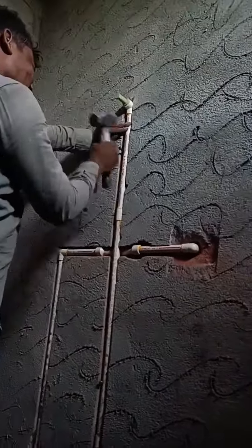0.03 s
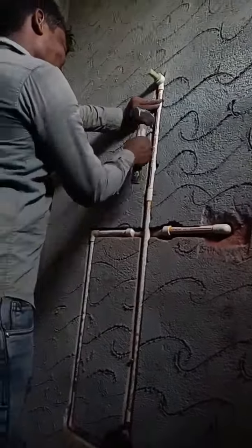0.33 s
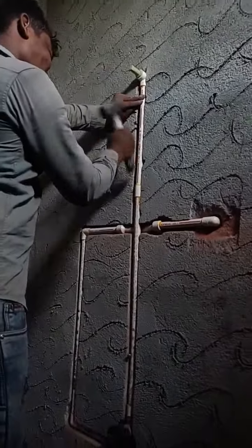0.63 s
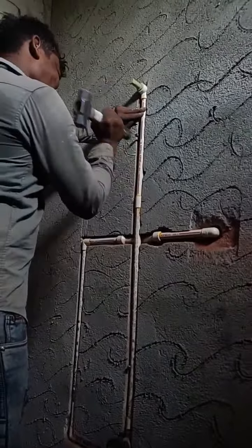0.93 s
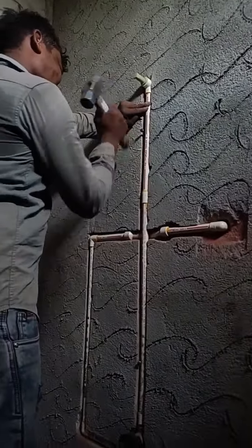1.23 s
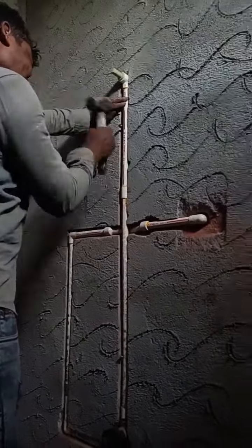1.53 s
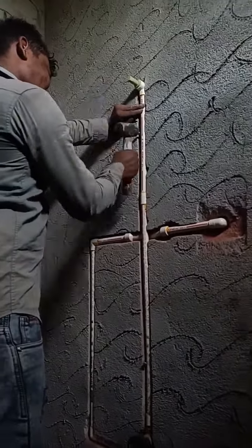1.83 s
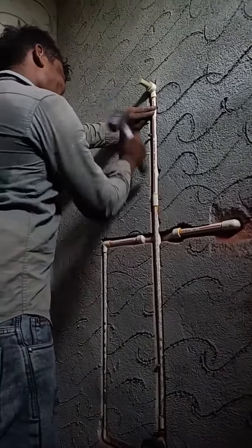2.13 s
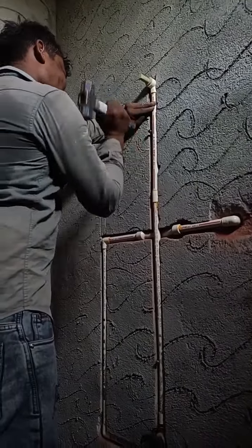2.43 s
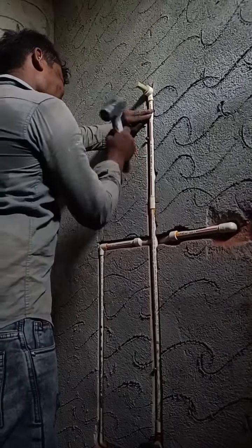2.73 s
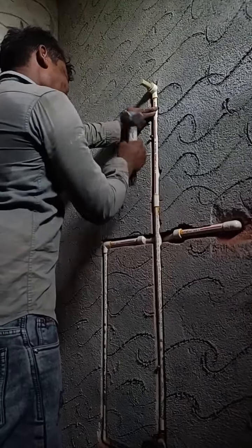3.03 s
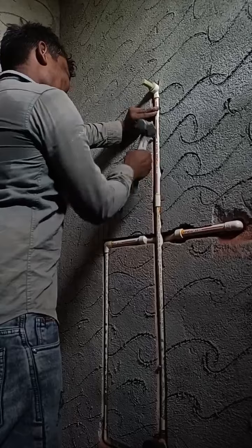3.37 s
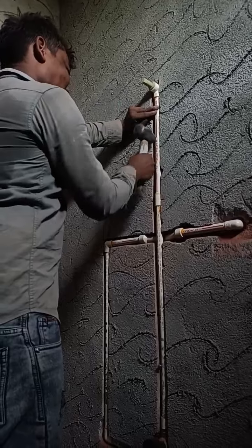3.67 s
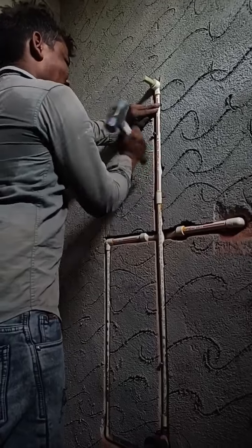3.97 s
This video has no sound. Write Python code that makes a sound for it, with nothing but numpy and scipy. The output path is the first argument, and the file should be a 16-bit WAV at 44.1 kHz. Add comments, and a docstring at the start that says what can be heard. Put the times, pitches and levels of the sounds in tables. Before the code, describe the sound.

A hammer drives a steel nail into a plastered wall in a small bare room. The evenly spaced blows boom and crack close by, and the later ones carry a brief, thin metallic ring.

```python
"""A hammer drives a steel nail into a plastered brick wall in a small bare room, in even blows.
Each blow is a push of about 1 ms that shortens as the nail tightens. Wall and room boom,
plaster cracks on top, and the steel rings briefly, louder in the later blows.
Two light touches of steel fall between blows. Behind: faint building air, a far tone
and three low puffs of air on the microphone."""
import sys
import numpy as np
from scipy import signal
from scipy.fft import rfft, irfft
from scipy.io import wavfile
from scipy.ndimage import uniform_filter1d

SR = 44100
rng = np.random.default_rng(int(sys.argv[2]) if len(sys.argv) > 2 else 0)


def wav_record(signal):
    """Record a signal, one row per channel, as 16-bit PCM in the file named by sys.argv[1]."""
    frames = np.transpose(np.atleast_2d(signal))
    bounded = np.clip(frames, -1, 1)
    # unit amplitude maps onto the largest positive 16-bit level
    quanta = np.round(bounded * 32767).astype(np.int16)
    wavfile.write(sys.argv[1], SR, quanta)


N = 176400

# start_s, wall_db, contact_ms, crack_db, ring_db, bass_db
HAMMER_BLOWS = [(-.215, -6, 0.8, 7, -22, 0.5), (0.16, -1.5, 1.096, -1, -22.5, -0.5),
                (0.5484, -2.5, 1.016, -0.5, -25, 1), (0.911, -2.5, 1.04, -1.5, -15, 0.5),
                (1.2922, -1.5, 1.094, -2, -18, -1), (1.677, -2.5, 1.026, -2.5, -14, -1),
                (2.0583, -2.5, 0.95, -2, -7, 0), (2.4501, -3.24, 0.89, -1, -21, -0.5),
                (2.8091, -2.5, 0.92, -1, -7.5, 0), (3.1811, -2.5, 0.86, -1, -14.5, -1),
                (3.5514, -3.5, 0.82, -1.5, -4, -0.5), (3.919, -2, .76, -1.5, -6.5, -7.5)]
# light touches of steel: start_s, level_db
TOUCHES = [(.42, -26.5), (0.542, -4)]
# wall and room boom: freq_hz, density_db
BOOM_SPECTRUM = [(30, -57.5), (62, -67), (88, -46.5), (125, -49), (155, -36), (198, -48), (250, -40),
                 (350, -43.5), (470, -39.5), (620, -40.5), (800, -37), (1000, -42), (1230, -43),
                 (1530, -43), (1900, -46.5), (2400, -50), (3200, -60), (5000, -61.5), (8000, -59.5),
                 (11000, -59), (12200, -51), (13500, -59), (15400, -64)]
# boom envelope: freq_hz, rise_s, hold_s, t60_s
BOOM_ENVELOPE = [(50, .015, .03, 0.51), (110, 0.014, 0.12, 0.87), (238, 0.014, 0.08, 0.54),
                 (432, 0.011, 0.046, 0.7), (696, 0.0033, 0.012, .47), (1620, .001, 0.0091, 0.35),
                 (2500, 0.00023, 0.016, 0.32), (5430, .0007, 0.028, 0.23), (10100, .0003, 0.0043, 0.19),
                 (15000, .0003, .005, 0.14)]
# wall and room modes: pitch_hz, level_db, t60_s, left_minus_right_db
WALL_MODES = [(111.9, -10.5, 1.08, 1.5), (145.3, -29, 1.5, 0.5), (165.8, -23.5, 1.2, 0.5),
              (217.2, -23.5, .8, 4.5), (262.8, -15, 0.72, 4.5), (312.7, -25, 0.36, 20.5),
              (325.2, -23, 0.99, 4), (355.6, -28, 1, -1.5), (388.6, -15, 0.27, 4), (440.7, -11, .44, 10.5),
              (487, -23, 0.17, 0), (612.5, -22.5, 0.51, 17), (656.7, -34.5, 0.26, 4),
              (778, -32.5, 0.79, 4.5)]
# nail knocking in its hole: pitch_hz, level_db, t60_s, left_minus_right_db
KNOCK_MODES = [(600, -13, 0.09, -6.5), (1536, -9.5, 0.066, -3), (2200, -21.5, 0.043, -3)]
# knock off the far walls: delay_s, pitch_hz, level_db, left_minus_right_db
KNOCK_ECHOES = [(0.037, 469.2, -10.5, 0), (.071, 448.2, -11.5, 1.5)]
# hammer head and nail: pitch_hz, level_db, t60_s, left_minus_right_db
STEEL_MODES = [(11420, -35, .17, 4), (11850, -16, .06, 6), (12590, -18, .24, -3), (13050, -32, .1, 0),
               (15460, -37, .11, -4)]
# left microphone port: freq_hz, gain_db
LEFT_RESPONSE = [(3000, -1.5), (5400, -2.5), (6750, -18), (8300, -0.5), (10000, 3), (12200, -1), (13500, 0),
                 (15400, -4.5)]
# right microphone port: freq_hz, gain_db
RIGHT_RESPONSE = [(3000, -1), (7400, 1.5), (8500, -7), (10100, -34.5), (11200, -1.5), (12000, -4),
                  (13000, -4), (15400, 9.5)]
# left-right likeness: freq_hz, correlation
COHERENCE = [(40, .9), (110, 1), (250, 0.73), (500, 0.26), (1000, 0.29), (2000, -0.045), (16000, 0)]
# air on the microphone: start_s, level_db
AIR_PUFFS = [(1.676, -30), (2.427, -26), (3.546, -35.5)]
# far tone: start_s, length_s, pitch_hz, level_db
DISTANT_TONE = (1.9, .19, 1930, -58)
# still building air: freq_hz, density_db
AIR_SPECTRUM = [(20, -75), (60, -80), (150, -63), (500, -78), (1000, -89), (2000, -90), (3200, -107),
                (6000, -112), (10000, -119), (15500, -123)]

EVENT_SAMPLES, LEAD_S = 49152, 0.5
MIX_SAMPLES = N + round(LEAD_S * SR)
T = np.arange(EVENT_SAMPLES) / SR
HZ = np.fft.rfftfreq(EVENT_SAMPLES, 1 / SR)


def hammer(scatter_from_hz=3200, bass_below_hz=390, touch_cutoff_hz=2800, touch_decay_s=0.009):
    """Blows and touches excite one wall; its treble scatters differently on each blow."""
    ports = amp([lookup(LEFT_RESPONSE, HZ), lookup(RIGHT_RESPONSE, HZ)])
    boom_a, boom_b = boom(), boom()
    modes = rfft(ring(WALL_MODES, rise_s=0.019) + ring(KNOCK_MODES, rise_s=0.00017) + knock_echoes())
    scatter = 1 - np.exp(-(HZ / scatter_from_hz) ** 4)
    fade = np.clip((1 - T) * 10, 0, 1)
    out = np.zeros((2, MIX_SAMPLES))
    for start_s, wall_db, contact_ms, crack_db, ring_db, bass_db in HAMMER_BLOWS:
        blend_rad = scatter * rng.uniform(-np.pi, np.pi)
        wall = (np.cos(blend_rad) * boom_a + np.sin(blend_rad) * boom_b + modes + snap()) * ports
        bass = amp(bass_db * np.exp(-(HZ / bass_below_hz) ** 2))
        impact = irfft(wall * bass * push(contact_ms, crack_db)) * fade
        add(out, start_s, amp(wall_db) * impact + amp(ring_db) * steel())
    lowpass = min_phase(1 / (1 + (HZ / touch_cutoff_hz) ** 2))
    touch = irfft((boom_a + snap()) * ports * lowpass) * np.exp(-T / touch_decay_s)
    for start_s, level_db in TOUCHES:
        add(out, start_s, amp(level_db) * touch)
    return out[:, -N:]


def push(contact_ms, crack_db):
    """Spectrum of a flat push, notched at multiples of 1/contact; crumbling plaster varies the treble."""
    notch_depth, notch_fade_hz, knee_hz = 0.86, 3900, 238
    crack_from_hz, grit_step_hz, grit_scale_db = 3500, 110, 3.6
    shaft_peak_db, shaft_width_hz = 3.5, 1000
    depth = notch_depth * np.exp(-(HZ / notch_fade_hz) ** 4)
    power = depth * np.sinc(HZ * contact_ms / 1000) ** 2 * (1 + (HZ / knee_hz) ** 2) + 1 - depth
    grit = np.interp(HZ / grit_step_hz, np.arange(EVENT_SAMPLES), rng.standard_normal(EVENT_SAMPLES))
    treble = 1 - np.exp(-(HZ / crack_from_hz) ** 2)
    shaft_hz = 10710 / contact_ms  # nail shaft sounds higher as contact shortens
    shaft_db = shaft_peak_db * np.exp(-((HZ - shaft_hz) / shaft_width_hz) ** 2)
    return min_phase(np.sqrt(power) * amp(shaft_db + treble * (crack_db + grit_scale_db * grit)))


def snap(gain_db=-11.5, peak_s=0.001, highpass_hz=4480):
    """Spectrum of the direct crack of steel on steel."""
    burst = rng.standard_normal((2, EVENT_SAMPLES)) * T / peak_s * np.exp(1 - T / peak_s)
    return amp(gain_db) * rfft(burst) * min_phase(HZ ** 2 / (HZ ** 2 + highpass_hz ** 2))


def steel(onset_s=0.0014, flutter_depth=0.6, highpass_hz=9000):
    """Bright clink, then the thin ring of hammer and nail, fluttered by the room."""
    flutter = uniform_filter1d(rng.standard_normal((2, EVENT_SAMPLES)), size=300, axis=1)
    flutter_gain = (1 + flutter_depth * flutter / flutter.std()) / np.hypot(1, flutter_depth)
    tone = ring(STEEL_MODES, onset_s) * flutter_gain
    noise = rfft(rng.standard_normal((2, EVENT_SAMPLES)))
    clink = irfft(noise * HZ ** 2 / (HZ ** 2 + highpass_hz ** 2))
    envelope = T / onset_s * np.exp(1 - (T / onset_s) ** 2) / 2
    return tone + amp(-5) * clink * envelope


def ring(modes, rise_s):
    """Struck modes: damped sines with a shared rise."""
    out = np.zeros((2, EVENT_SAMPLES))
    for pitch_hz, level_db, t60_s, side_db in modes:
        tone = np.sin(2 * np.pi * (pitch_hz * T + rng.random()))
        out += pan(side_db) * amp(level_db) * np.exp(-np.log(1000) * T / t60_s) * tone
    return out * (1 - np.exp(-T / rise_s))


def boom(bands=40):
    """Spectrum of dense wall and room echoes; each band rises, holds and dies at its own rate."""
    noise, out = stereo_noise(EVENT_SAMPLES), np.zeros((2, EVENT_SAMPLES))
    centres_hz = np.geomspace(200, 17000, bands) - 180
    band_index = np.interp(HZ, centres_hz, np.arange(bands))
    for k, centre_hz in enumerate(centres_hz):
        window = np.cos(np.pi / 2 * np.clip(band_index - k, -1, 1)) ** 2
        rise_s, hold_s, t60_s = (lookup(BOOM_ENVELOPE, centre_hz, column) for column in (1, 2, 3))
        envelope = (1 - np.exp(-T / rise_s)) * np.exp(-np.log(1000) * np.maximum(T - hold_s, 0) / t60_s)
        band = irfft(noise * window) * envelope
        energy = np.sum(window ** 2) * HZ[1] * np.sum(envelope ** 2)
        out += band * np.sqrt(energy / np.sum(band ** 2, 1, keepdims=True))
    return rfft(out) * amp(lookup(BOOM_SPECTRUM, HZ))


def knock_echoes(width_s=0.0076):
    """The hollow knock returns in bunches from the far walls."""
    out = np.zeros((2, EVENT_SAMPLES))
    for delay_s, pitch_hz, level_db, side_db in KNOCK_ECHOES:
        swell = np.exp(-((T - delay_s) / width_s) ** 2)
        out += pan(side_db) * amp(level_db) * swell * np.sin(2 * np.pi * (pitch_hz * T + rng.random()))
    return out


def puffs(cutoff_hz=50, peak_s=0.013, side_db=-15):
    """Deep, brief buffets of air, different at each port."""
    out = np.zeros((2, MIX_SAMPLES))
    for start_s, level_db in AIR_PUFFS:
        rumble = irfft(rfft(rng.standard_normal((2, EVENT_SAMPLES))) / (1 + (HZ / cutoff_hz) ** 4))
        gust = rumble * T * np.exp(-T / peak_s)
        rms = np.sqrt(np.sum(gust ** 2, 1, keepdims=True) / (2 * peak_s * SR))
        add(out, start_s, amp(level_db) * pan(side_db) * gust / rms)
    return out[:, -N:]


def far_tone():
    """One faint, thin tone swells and fades."""
    start_s, length_s, pitch_hz, level_db = DISTANT_TONE
    out = np.zeros((2, MIX_SAMPLES))
    swell = np.sin(np.pi * np.minimum(T / length_s, 1))
    add(out, start_s, pan(0) * amp(level_db) * swell * np.sin(2 * np.pi * pitch_hz * T))
    return out[:, -N:]


def building_air():
    """Faint, steady, low noise of the building."""
    density = amp(lookup(AIR_SPECTRUM, np.fft.rfftfreq(N, 1 / SR)))
    return irfft(stereo_noise(N) * density, N) * np.sqrt(SR / 2)


def stereo_noise(samples):
    """White noise spectra at the two ports, alike in the bass."""
    left, independent = rfft(rng.standard_normal((2, samples)))
    likeness = np.clip(lookup(COHERENCE, np.fft.rfftfreq(samples, 1 / SR)), -1, 1)
    return np.array([left, likeness * left + np.sqrt(1 - likeness ** 2) * independent])


def min_phase(gain):
    """Minimum-phase response with these gains."""
    log_gain = np.log(np.maximum(gain, 1e-5))
    return np.exp(np.conj(signal.hilbert(np.r_[log_gain, log_gain[-2:0:-1]])))[:len(gain)]


def lookup(table, freq_hz, column=1):
    """Table column interpolated over log frequency."""
    columns = np.transpose(table)
    return np.interp(np.log(freq_hz + 1), np.log(columns[0] + 1), columns[column])


def amp(db):
    """Decibels to gain."""
    return 10 ** (np.asarray(db) / 20)


def pan(side_db):
    """Stereo gains for a left-minus-right level."""
    return amp([[side_db / 2], [-side_db / 2]])


def add(mix, start_s, sound):
    """Adds a sound to a mix that begins LEAD_S early."""
    part = mix[:, round((start_s + LEAD_S) * SR):][:, :sound.shape[1]]
    part += sound[:, :part.shape[1]]


def scene():
    """Hammering over still air."""
    return hammer() + puffs() + far_tone() + building_air()


def record(dry):
    """Soft clip, then band limit."""
    ceiling, cutoff_hz = 1.5, 15650
    rounded = ceiling * np.tanh(dry / ceiling)
    lowpass = signal.firwin(361, cutoff_hz, window=("kaiser", 9), fs=SR)
    return signal.oaconvolve(rounded, lowpass[None], "same")


dry = scene()
out = record(dry)
wav_record(out)
```